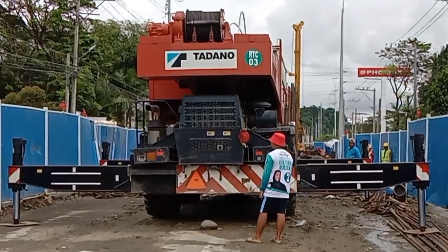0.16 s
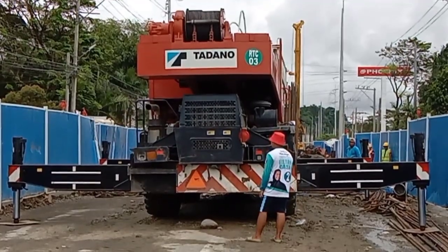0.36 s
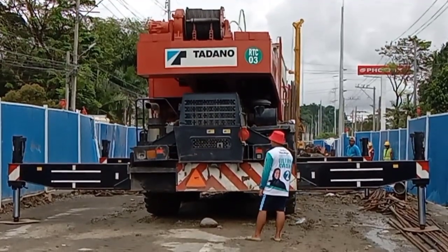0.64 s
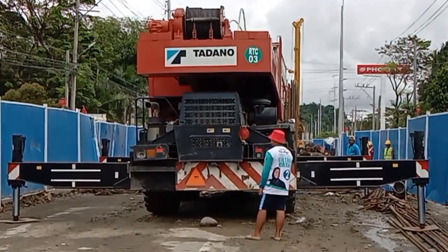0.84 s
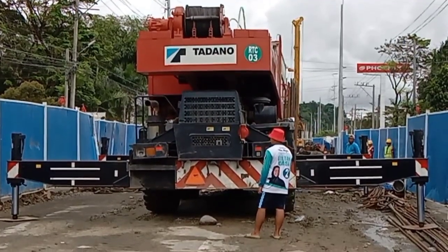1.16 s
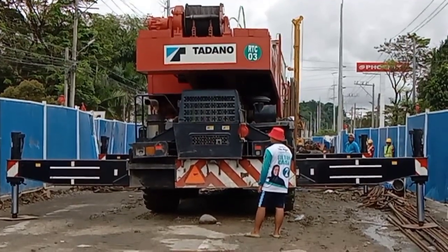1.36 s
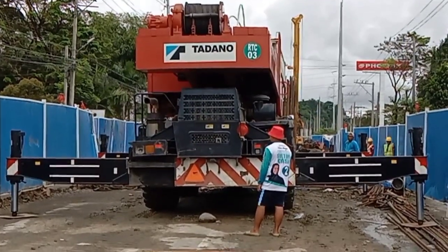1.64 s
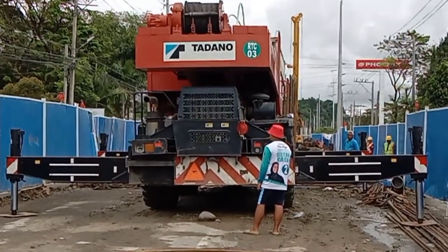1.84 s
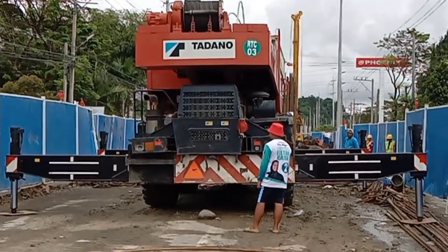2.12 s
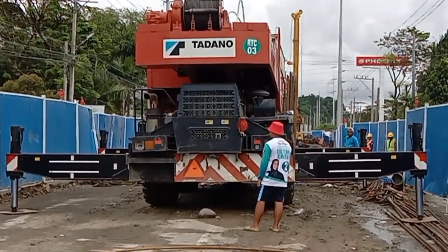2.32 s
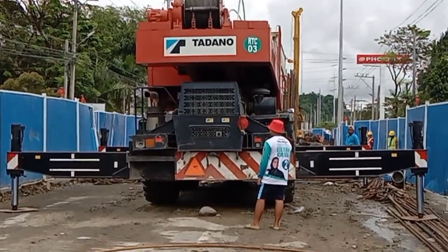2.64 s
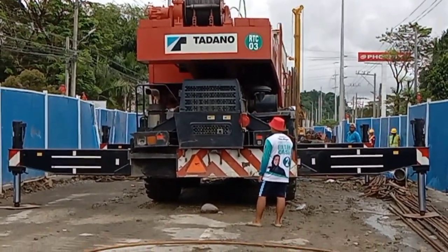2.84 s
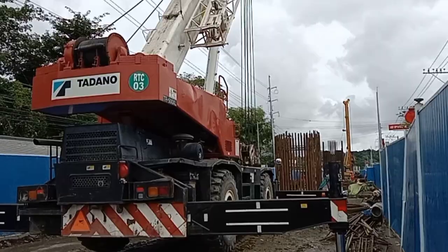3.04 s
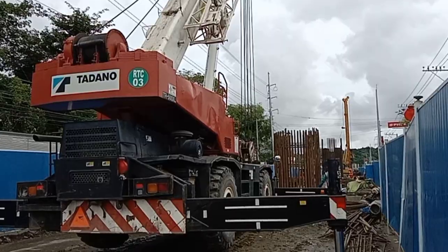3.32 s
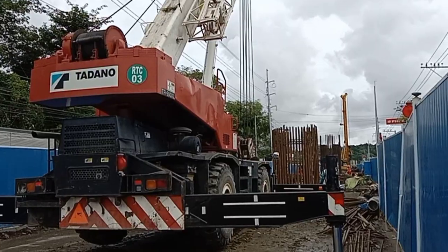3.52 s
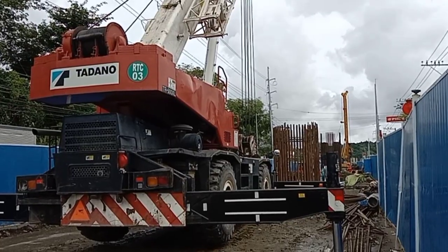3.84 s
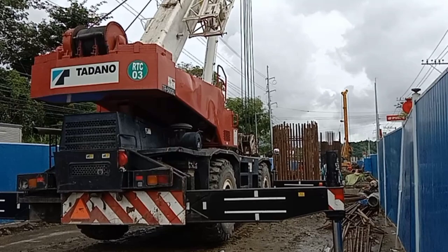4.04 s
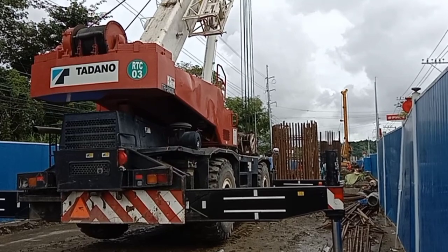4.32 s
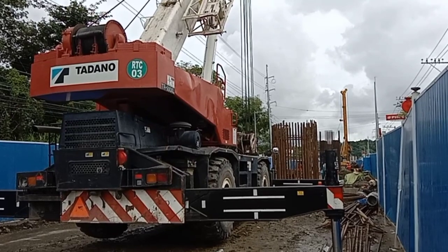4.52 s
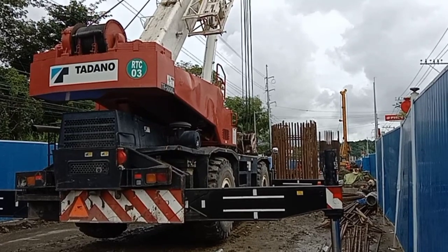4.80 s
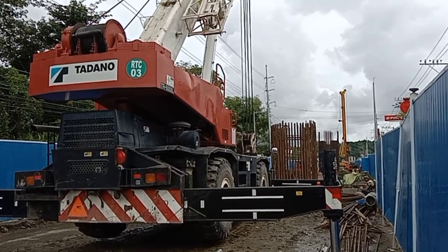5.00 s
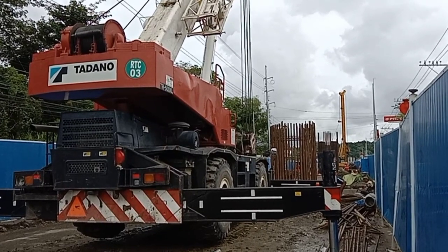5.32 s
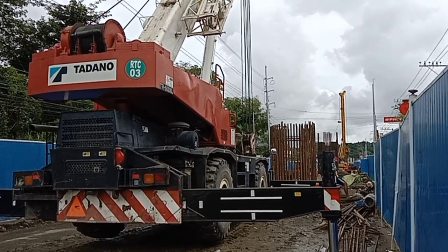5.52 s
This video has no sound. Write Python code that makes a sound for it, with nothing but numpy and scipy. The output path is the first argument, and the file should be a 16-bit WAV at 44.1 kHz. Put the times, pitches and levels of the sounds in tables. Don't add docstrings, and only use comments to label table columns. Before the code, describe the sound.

A big diesel engine roars close by as a lorry whines past and a brake squeals, then an abrupt cut to a quieter, hissing idle.

```python
import sys
import numpy as np
from scipy import signal
from scipy.fft import rfft, irfft, next_fast_len
from scipy.io import wavfile

SR = 44100
rng = np.random.default_rng(int(sys.argv[2]) if len(sys.argv) > 2 else 0)


def to_wav(s):
    ch = np.atleast_2d(s).T
    pcm = np.round(np.clip(ch, -1, 1) * 32767)
    wavfile.write(sys.argv[1], SR, pcm.astype(np.int16))


def boost_factor(decibels):
    exponent = np.asarray(decibels, float) / 20
    return 10 ** exponent


N = 249606

# (frequency [Hz], level [dB])
NEAR_BRIGHT = [(1880, -32), (3200, 13.5), (3550, 6), (3950, -4.5), (4720, 4.5), (5310, 7), (6860, -0.5),
               (7520, -7), (8250, -16), (10600, -20.5), (12600, -18), (14900, -18.5), (15400, -15)]
FAN_SHARE = 0.34


def rms_one(x):
    return x / np.sqrt(np.mean(x ** 2) + 1e-20)


def in_time(rows):
    s, *columns = np.transpose(rows)
    return [np.interp(np.arange(N) / SR, s, c) for c in columns]


def sounding(rows, fade_s):
    t = np.arange(N) / SR
    inside = np.minimum(t - rows[0][0], rows[-1][0] - t)
    return np.clip(inside / fade_s + 1, 0, 1)


def drift(rate_hz):
    every = 40
    r = np.exp(-2 * np.pi * every * rate_hz / SR)
    settle = 2000
    noise = rng.standard_normal(N // every + 2 + settle)
    slow = signal.lfilter([1], [1, -2 * r, r * r], noise)[settle:]
    return np.interp(np.arange(N) / every, np.arange(len(slow)), rms_one(slow - slow.mean()))


def coloured(x, colour, low_hz, high_hz):
    hz = np.maximum(np.arange(N // 2 + 1) * SR / N, 1)
    point_hz, point_db = np.transpose(colour)
    gain = boost_factor(np.interp(np.log(hz), np.log(point_hz), point_db))
    edge = 1 / np.sqrt((1 + (low_hz / hz) ** 16) * (1 + (hz / high_hz) ** 16))
    return rms_one(irfft(rfft(x) * gain * edge, N))


def turns(hz, jitter):
    return np.cumsum(hz * (1 + jitter * drift(6.34))) / SR


def orders(cycles, numbers, levels_db, flutter_db, spread=1):
    out = 0
    for number, db in zip(numbers, levels_db):
        level = np.sqrt(2) * boost_factor(db + flutter_db * np.clip(drift(11), -3, 1.5))
        out = out + level * np.sin(2 * np.pi * (number * cycles + spread * rng.random()))
    return out


def machine(rows, pattern, jitter, flutter_db, fade_s):
    hz, db = in_time(rows)
    numbers, order_db = np.transpose(pattern)
    cycles = turns(hz, jitter)
    tones = orders(cycles, np.round(numbers), [db + d for d in order_db], flutter_db)
    return cycles, tones * sounding(rows, fade_s)


def surges(rows):
    t = np.arange(N) / SR
    swells = []
    for s, db, length_s in rows:
        part = np.clip((t - s) / length_s, 0, 1)
        swells.append(db * np.sin(np.pi * part ** 0.74))
    return np.max(swells, axis=0)


def stray_noise():
    # (time [s], lowest frequency [Hz], highest frequency [Hz], level [dB])
    specks = [(0.521, 5200, 6300, -38), (.731, 9600, 11900, -52), (1.288, 13050, 14600, -47),
              (1.334, 13170, 15300, -52), (1.335, 8200, 9800, -51), (1.985, 12300, 13900, -53),
              (2.078, 11710, 13200, -50), (2.078, 4170, 5130, -45), (2.705, 5130, 7070, -36),
              (2.705, 7465, 9050, -48), (4.377, 7496, 9000, -62), (4.40, 8200, 9800, -62),
              (4.40, 4700, 5800, -55), (4.539, 6200, 7650, -54)]
    t, out = np.arange(N) / SR, np.zeros(N)
    for s, low_hz, high_hz, db in specks:
        at = slice(int((s - .05) * SR), int((s + .05) * SR))
        band_pass = signal.butter(6, [low_hz, high_hz], "band", fs=SR, output="sos")
        band = signal.sosfilt(band_pass, rng.standard_normal(len(t[at])))
        bump = np.cos(np.pi * np.clip((t[at] - s) / .046, -.5, .5)) ** 2
        out[at] += boost_factor(db) * rms_one(band) * bump
    return out


def site(x):
    # (delay [ms], level [dB])
    echo_rows = [(2.3, -18.5), (5.9, -23.5), (11.3, -15.5), (19.7, -21)]
    now, out, power = np.arange(N), x, 1
    for ms, db in echo_rows:
        delay = np.round((ms + .25 * drift(1.5)) * SR / 1000)
        out = out + boost_factor(db) * np.interp(now - delay, now, x)
        power += boost_factor(2 * db)
    return out / np.sqrt(power)


def roar(levels_db, colours, cycles, knock, grit_db):
    layer_edges_hz = [10, 350, 3800, 7800, 20000]
    out, firing = 0, np.cos(2 * np.pi * 3 * cycles)
    for k, level_db in enumerate(levels_db):
        grit = boost_factor(grit_db[k] * drift(250))
        clatter = boost_factor(grit_db[k] * drift(12)) ** (.9 - 0.11 * k)
        noise = rng.standard_normal(N) * grit * (1 + knock[k] * firing)
        layer = coloured(noise, colours[k], *layer_edges_hz[k:k + 2])
        out = out + boost_factor(level_db) * clatter * layer
    return site(out)


def second_machine():
    # (time [s], cycle rate [Hz], load [dB])
    pump_run = [
        (1.6, 32.64, -2.5),
        (2.05, 33.6, -5.5),
        (2.3, 33.65, -6.5),
        (2.46, 34.3, 2.5),
        (2.96, 33.6, -0.5),
    ]
    # (order [multiple of cycle rate], level [dB])
    pump_orders = [(4, -31), (5, -34), (6, -33)]
    return machine(pump_run, pump_orders, jitter=0.006, flutter_db=4.5, fade_s=0.19)[1]


def lorry():
    # (time [s], firing rate [Hz], nearness [dB])
    lorry_pass = [
        (0, 64.5, -4),
        (.2, 68.4, -6),
        (.58, 72.1, 3),
        (.72, 73.2, -3.5),
        (.86, 74.43, 3.5),
        (1.0, 73, 0.5),
        (1.15, 68.7, -9),
        (1.25, 65, -15),
    ]
    # (order [multiple of firing rate], level [dB])
    lorry_orders = [(2, -33), (3, -34), (4, -26.5), (6, -43.5)]
    return machine(lorry_pass, lorry_orders, jitter=0.00589, flutter_db=4.0, fade_s=.05)[1]


def whine():
    from_s, lift_off_s = .45, .89
    top_hz, climb_hz_per_s = 1830, 250
    top_db, swell_db_per_s = -26.5, 18
    before = np.minimum(np.arange(N) / SR - lift_off_s, 0)
    cycles = turns(top_hz + climb_hz_per_s * before, jitter=.003)
    tone = orders(cycles, [1], [top_db + swell_db_per_s * before], flutter_db=1.0)
    return tone * sounding([[from_s], [lift_off_s]], .04)


def squeal():
    # (time [s], length [s], pitch [Hz], level [dB])
    grabs = [
        (1.768, 0.059, 6250, -35.5),
        (1.81, 0.089, 6200, -19.5),
        (1.884, .053, 6280, -32),
        (1.884, .053, 6190, -31.5),
        (1.925, 0.073, 6190, -33),
        (1.984, .06, 6225, -42),
    ]
    grab_s, let_go_s = 0.03, .006
    settle_hz, settle_s = 110, 0.018
    octave_db, octave_follows = -38, .45
    t, out = np.arange(N) / SR, np.zeros(N)
    for s, length_s, hz, db in grabs:
        grip = np.clip((t - s) / grab_s, 0, 1)
        release = np.clip((s + length_s - t) / let_go_s + 1, 0, 1)
        sharp_hz = settle_hz * np.exp(-np.maximum(t - s, 0) / settle_s)
        cycles = turns(hz + sharp_hz, jitter=.0006)
        levels_db = [db, octave_follows * db + octave_db]
        out += grip ** 2 * release * orders(cycles, [1, 2], levels_db, flutter_db=1.0)
    return out


def rattle():
    # (time [s], peak level [dB])
    knocks = [(0.124, 1), (0.149, -8), (0.2344, -7), (0.2444, -3), (0.31, -3), (0.4473, -5.5), (0.8633, -8),
              (0.9491, -3.5)]
    t60_s, rise_s = 0.043, 0.0013
    t, envelope = np.arange(N) / SR, np.zeros(N)
    for s, db in knocks:
        after = np.maximum(t - s, 0)
        envelope += boost_factor(db - 18.5 - 60 * after / t60_s) * (1 - np.exp(-after / rise_s))
    return envelope * coloured(rng.standard_normal(N), NEAR_BRIGHT, 3800, 16000)


def working_crane():
    # (time [s], cycle rate [Hz], effort [dB])
    work_run = [(0, 21.88, 3), (.45, 22.6, 7.5), (.75, 22.18, 2), (1.0, 22.14, 4), (1.4, 23.33, 1.5),
                (1.7, 22.91, 0), (2.3, 22.97, -4), (2.96, 23.8, -4)]
    # (order [multiple of cycle rate], level at mean effort [dB])
    work_orders = [(5, -42), (6, -33), (7, -33.5), (9, -39.5), (10, -33.5)]
    # (time [s], level [dB])
    traffic = [(0, 4), (.3, 4.5), (.84, 3.5), (1.0, 0), (1.5, -2.5), (1.67, -1.5), (1.9, -2.5), (2.3, -1),
               (2.64, 1.5), (2.96, .5)]
    # (time [s], rise [dB], length [s])
    blows = [(.15, 2.5, 0.17), (.31, 4, 0.037), (.78, 1, 0.11), (1.45, 3, 0.34), (1.76, -1, .08),
             (2.1, 2.5, 0.63), (2.7, 2.5, 0.28)]
    near_db = [-26, -22, -33.5, -36]
    near_follows = [0.18, 0.93, 0.71, 0.27]
    # (frequency [Hz], level [dB])
    near_low = [(15, -61), (25, -30.5), (59, -3.5), (145, 1), (215, -1), (249, -4), (286, -4), (340, -10.5),
                (446, -18), (480, -14), (620, -45), (1060, -120)]
    # (frequency [Hz], level [dB])
    near_mid = [(160, -30.5), (280, -3.5), (297, -1), (349, -11), (444, -9), (493, -11), (712, -7),
                (847, -12.5), (1010, -4), (1200, -4.5), (1790, -10), (2060, -15), (3530, -22.5),
                (3920, -24.5), (4400, -19), (5720, -57.5), (9680, -120)]
    cycles, tones = machine(work_run, work_orders, jitter=0.01315, flutter_db=3.0, fade_s=.05)
    traffic_db, = in_time(traffic)
    blow_db = surges(blows)
    levels_db = [db + share * traffic_db for db, share in zip(near_db, near_follows)]
    levels_db[2] = levels_db[2] + FAN_SHARE * blow_db
    levels_db[3] = levels_db[3] + blow_db
    noise = roar(levels_db, [near_low, near_mid, NEAR_BRIGHT, NEAR_BRIGHT], cycles,
                 knock=[0.089, .05, .04, .03], grit_db=[.5, 0.98, 0.98, 1.1])
    return noise + tones


def idling_crane():
    # (time [s], cycle rate [Hz])
    idle_run = [(3.1, 21.1), (3.75, 21.95), (4.25, 23.14), (4.75, 24.21), (5.3, 24.81), (5.66, 24.6)]
    # (frequency [Hz], level [dB])
    pipe = [(80, -45), (92, -45), (108, -48), (122, -41.5), (136, -47), (152, -39.5), (165, -43),
            (178, -61)]
    # (order [multiple of cycle rate], level [dB])
    side_orders = [(2, -59), (3, -55), (8, -52), (11, -56), (12, -52.5), (13, -55.5)]
    # (time [s], rise [dB])
    puffs = [(3.333, 6.5), (3.55, 7), (3.67, 4), (3.78, 5), (3.88, 1), (4.016, 5), (4.23, 7), (4.32, 3),
             (4.459, 4), (4.528, 5.5), (4.689, 5), (4.91, 4), (5.011, 4.5), (5.15, 4), (5.2, 5.5),
             (5.364, 9.5), (5.468, 5.5), (5.595, 6)]
    far_db = [-40, -39, -48.5, -55.5]
    # (frequency [Hz], level [dB])
    far_low = [(15, -54), (25, -21), (59, -14), (76, -4), (152, -1.5), (226, -4.5), (282, -10), (394, -21),
               (435, -25), (480, -24), (620, -48), (1060, -120)]
    # (frequency [Hz], level [dB])
    far_mid = [(160, -30), (280, 1), (318, 3), (345, -8), (391, -3.5), (434, -11.5), (476, -11.5),
               (516, -13.5), (579, -8), (746, -10.5), (1180, -5), (1990, -15), (2910, -21), (3970, -23.5),
               (4400, -18), (5720, -54), (9680, -120)]
    # (frequency [Hz], level [dB])
    far_high = [(1880, -35), (3200, -18), (4190, -15.5), (4500, -2.5), (5380, 1.5), (6860, 0),
                (8750, -12.5), (10000, -13.5), (13300, -18.5), (14800, -17), (15400, -16)]
    in_step = .4
    longest_puff_s, hiss_share = 0.16, 0.72

    hz, = in_time(idle_run)
    cycles = turns(hz, jitter=.011)
    pipe_db = [np.interp(k * hz, *np.transpose(pipe)) for k in range(4, 8)]
    tones = orders(cycles, range(4, 8), pipe_db, flutter_db=3.4, spread=in_step)
    numbers, side_db = np.transpose(side_orders)
    tones += orders(cycles, np.round(numbers), side_db, flutter_db=4.0, spread=in_step)

    s, rise_db = np.transpose(puffs)
    length_s = np.minimum(np.diff(s, append=N / SR), longest_puff_s)
    surge_db = surges(zip(s, rise_db, length_s))
    levels_db = [db + share * surge_db for db, share in zip(far_db, [0, 0, FAN_SHARE, hiss_share])]
    noise = roar(levels_db, [far_low, far_mid, far_high, far_high], cycles,
                 knock=[0.059, 0.063, 0.051, 0.11], grit_db=[.3, .5, .9, 1.1])
    return tones + noise


def scene():
    cut_s, fade_from_s, fade_to_s = 2.9705, 3.068, 3.353
    t = np.arange(N) / SR
    near_gain = np.clip(1 - (t - cut_s) / .002, 0, 1) ** 2
    far_gain = np.clip((t - fade_from_s) / (fade_to_s - fade_from_s), 0, 1) ** 0.95
    near = second_machine() + lorry() + whine() + squeal() + rattle() + working_crane()
    mono = near * near_gain + idling_crane() * far_gain
    return np.stack([mono, mono])


def band_limit(x):
    return signal.sosfilt(signal.butter(12, 16570, fs=SR, output="sos"), x)


def record(dry):
    bass_hz, top_hz = 38., 15550
    size = next_fast_len(N + 8192)
    hz = np.arange(size // 2 + 1) * SR / size
    spectrum = rfft(dry + stray_noise() * [[1], [-1]], size)
    spectrum *= hz ** 2 / np.sqrt(hz ** 4 + bass_hz ** 4)
    spectrum *= np.clip((top_hz - hz) / 60, 0, 1)
    mix = irfft(spectrum, size)[:, :N]
    return band_limit(mix)


dry = scene()
out = record(dry)
to_wav(out)
```